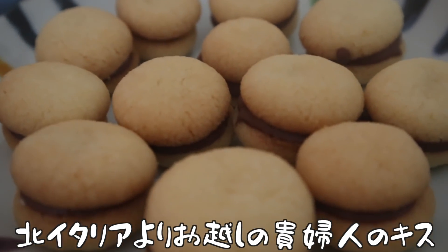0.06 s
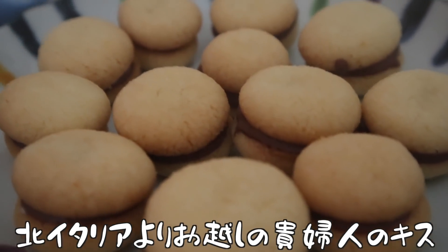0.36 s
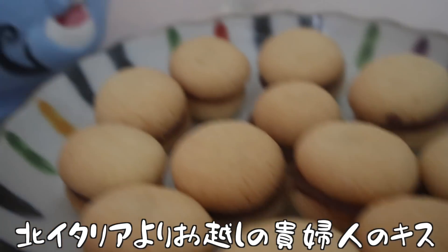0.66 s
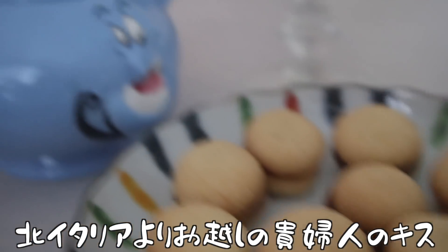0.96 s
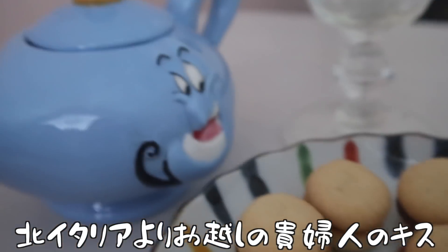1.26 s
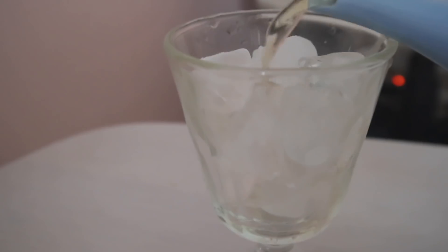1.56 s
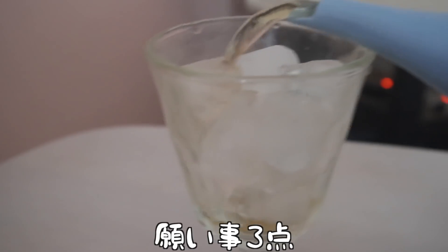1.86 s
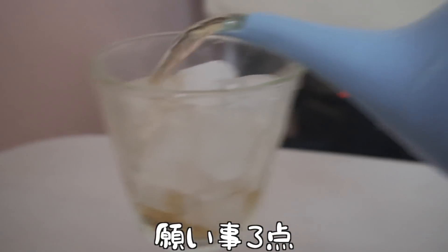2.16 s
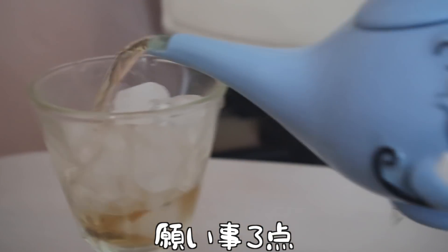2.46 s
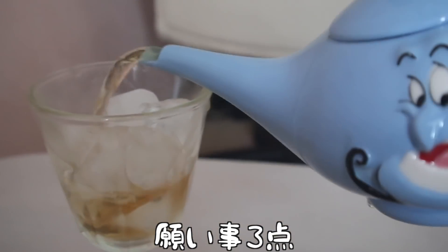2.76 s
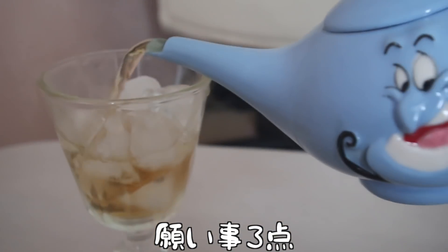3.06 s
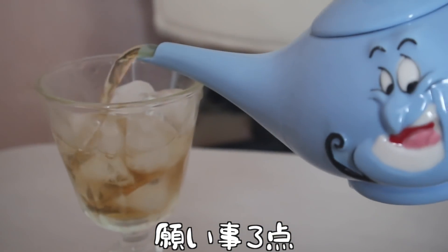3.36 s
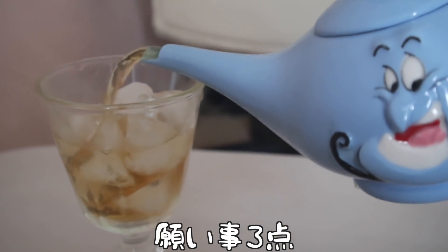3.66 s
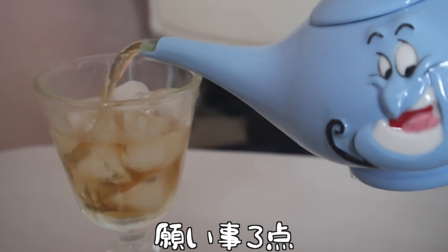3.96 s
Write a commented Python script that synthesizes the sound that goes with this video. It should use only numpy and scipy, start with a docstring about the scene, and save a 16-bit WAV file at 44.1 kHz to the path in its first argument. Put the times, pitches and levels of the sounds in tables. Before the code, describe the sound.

A thin stream of liquid trickles into a glass of crackling, knocking ice cubes.

```python
"""A quiet kitchen rumbles and hums; after a few soft ticks the background hiss steps up, and tea is
poured over ice in a glass close by. The cubes knock together and snap as they warm. Each impact excites
the modes of the cubes, the glass and the air above the tea, whose resonance rises as the glass fills.
Between the knocks a thin trickle patters and plops, and air freed from the melting ice fizzes."""
import sys
import numpy as np
from scipy import signal
from scipy.fft import rfft, irfft, next_fast_len
from scipy.io import wavfile

SR = 44100
rng = np.random.default_rng(int(sys.argv[2]) if len(sys.argv) > 2 else 0)


def log_audio(samples):
    """Write samples as a 16-bit WAV file to the path given in sys.argv[1]."""
    # one column per channel
    frames = np.atleast_2d(samples).T
    # limit to full scale, then quantise
    limited = np.clip(frames, -1, 1)
    pcm = np.round(limited * 32767).astype(np.int16)
    wavfile.write(sys.argv[1], SR, pcm)


N = 176400
TOP_HZ = 16500


def amp(db):
    """Decibels as an amplitude ratio."""
    return 10 ** (np.asarray(db) / 20)


def unit(x):
    """Normalisation to rms 1."""
    return x / np.sqrt(np.mean(x ** 2) + 1e-20)


def blow(x, duration_s=0.005):
    """Normalisation to the energy of a short pulse of rms 1."""
    return x * np.sqrt(duration_s * SR / (np.sum(x ** 2) + 1e-20))


def along(points, hz):
    """Interpolation on a logarithmic frequency axis."""
    f, values = np.transpose(points)
    return np.interp(np.log(hz + 1), np.log(f + 1), values)


def at(points, s):
    """Linear interpolation in time."""
    return np.interp(s, *np.transpose(points))


def filtered(x, response):
    """Linear filtering: the spectrum is multiplied by a frequency response."""
    n = x.shape[-1]
    size = next_fast_len(n + 4096)
    return irfft(rfft(x, size) * response(np.fft.rfftfreq(size, 1 / SR)), size)[..., :n]


def add(track, start_s, x):
    """Superposition of x on the track."""
    part = track[max(round(start_s * SR), 0):][:len(x)]
    part += x[:len(part)]


def ring(t, hz, t60):
    """A damped oscillator that builds up within its first cycle."""
    return np.sin(2 * np.pi * hz * t) * amp(-60 * t / t60) * (1 - np.exp(-2 * hz * t))


def band(x, hz, width):
    """A Gaussian band-pass; width is a fraction of the centre frequency."""
    return filtered(x, lambda f: np.exp(-((f / hz - 1) / width) ** 2 / 2))


def burst(t, hz, width, t60):
    """A transient of exponentially decaying band noise."""
    noise = np.pad(rng.standard_normal(len(t)) * amp(-60 * t / t60), (32, 0))
    return blow(band(noise, hz, width)[20:-12])


def room_tone():
    """Background noise: a broadband rumble with swelling bass, and phase-modulated appliance hum."""
    spectrum = [(15, -37), (25, -46), (49, -5), (108, -2), (145, -4.5), (185, -6), (344, -10), (416, -14.5),
                (463, -14), (659, -22), (936, -21.5), (1130, -24.5), (1330, -25.5), (9570, -49),
                (16000, -86)]  # rumble: frequency_hz, relative_density_db
    width = [(60, -45), (110, -32.5), (200, -19), (380, -12), (700, -3.5), (1290, -2.5), (2380, 2),
             (4400, 5), (8120, 3), (15000, 21)]  # stereo spread: frequency_hz, side_over_mid_db
    swell = [(0, 0.5), (1.2, 4.1), (2.9, 1.5), (3.05, 12.8), (3.25, 7.9), (3.5, 4.5), (4, 8.5)]  # bass of the rumble: time_s, gain_db
    hum_tones = [(59.5, -51.5), (247.6, -52)]  # appliance: pitch_hz, level_db
    t = np.arange(N) / SR
    noise = rng.standard_normal((2, N))
    mid, side = filtered(noise, lambda f: amp([along(spectrum, f), along(spectrum, f) + along(width, f)]))
    air = amp(-38.5) * unit(np.array([mid + side, mid - side]))
    bass = filtered(air, lambda f: 1 / (1 + (f / 80) ** 4))  # below 80 Hz
    hum = 0
    for hz, db in hum_tones:
        drift = unit(filtered(rng.standard_normal(N), lambda f: np.exp(-(f / 3) ** 2)))
        hum += amp(db) * np.sqrt(2) * np.sin(2 * np.pi * hz * t + 1.2 * drift)
    return air + (amp(at(swell, t)) - 1) * bass + hum


def taps():
    """Heavily damped transients, heard as dull ticks leading up to the pour."""
    ticks = [(.848, -48), (.899, -44), (1.002, -42.5), (1.573, -48)]  # soft ticks: start_s, level_db
    out, t = np.zeros(N), np.arange(SR // 25) / SR
    for s, db in ticks:
        add(out, s, amp(db) * burst(t, hz=1200, width=0.28, t60=0.03))
    return out


def diffuse_tail():
    """A diffuse field's impulse response: noise decaying band by band, alike in both ears when low."""
    decay = [(400, 0.23), (1100, 0.2), (2800, 0.17), (7000, 0.18), (11000, 0.17), (14000, 0.058)]  # reverberation time: frequency_hz, t60_s
    colour = [(300, 3.5), (1100, -4.5), (2000, -3), (3000, -4), (4700, 1), (7000, 0.5), (11000, -1),
              (14000, 7)]  # reverberant spectrum: frequency_hz, gain_db
    likeness = [(400, 0.98), (1500, 0.92), (3000, 0.46), (6000, -0.21)]  # left against right: frequency_hz, correlation

    def mid_side_gains(f):
        angle = np.arccos(np.clip(along(likeness, f), -1, 1)) / 2
        return np.array([np.cos(angle), np.sin(angle)])

    hz, t, bands = signal.stft(rng.standard_normal((2, SR // 3)), SR, nperseg=256)
    fade = amp(-60 * t / along(decay, hz)[:, None]) * (1 - np.exp(-t / 0.0005))
    tail = signal.istft(bands * fade, SR, nperseg=256)[1]
    mid, side = filtered(tail / np.linalg.norm(tail[0]), mid_side_gains)
    return filtered(np.array([mid + side, mid - side]), lambda f: amp(along(colour, f)))


def kitchen(x, size=8820):
    """Early reflections interfere with the direct sound; an ever-changing reverberation follows."""
    walls = [(.0029, 0.091), (.0081, 0.043), (0.0097, .12)]  # echoes from nearby surfaces: delay_s, gain
    reverb, padded = np.zeros((2, N)), np.pad(x, (0, size))
    for start in range(0, N, size // 2):
        piece = padded[start:start + size] * np.sqrt(np.hanning(size))
        for track, response in zip(reverb, signal.fftconvolve(piece[None], diffuse_tail(), axes=1)):
            add(track, start / SR, response)
    near = filtered(x, lambda f: 1 + sum(gain * np.exp(-2j * np.pi * f * s) for s, gain in walls))
    return near + amp(-3) * reverb


def background_hiss(start_s=1.544, rise_s=0.061):
    """Spectrally shaped noise: a steady hiss and low hum that step up just before the pour."""
    spectrum = [(150, -21), (260, 6.5), (400, -16), (500, 1.5), (620, 1), (1100, -8), (2000, -23),
                (3000, -23.5), (5000, -23), (8000, -25.5), (11000, -29), (16000, -64)]  # background hiss and low hum: frequency_hz, relative_density_db
    hiss = unit(filtered(rng.standard_normal(N), lambda f: amp(along(spectrum, f))))
    onset = np.clip((np.arange(N) / SR - start_s) / rise_s, 0, 1)
    return amp(-51.5) * onset * hiss


def bubbles(per_s, hz, spread, cycles, scatter_db):
    """Bubble resonance: randomly timed, rising rings with log-normal pitches, at rms 1 overall."""
    out, t = np.zeros(N), np.arange(SR // 50) / SR
    when, radius, angle, strength = rng.random((int(per_s * N / SR), 4)).T
    pitches = hz * np.exp(spread * np.sqrt(-2 * np.log(1 - radius)) * np.cos(2 * np.pi * angle))
    gains = amp(scatter_db * np.minimum(-np.log(1 - strength), 4))
    for s, pitch, gain in zip(when * N / SR, np.minimum(pitches, TOP_HZ), gains):
        t60 = cycles / pitch
        glide = 1 + 0.26 * np.minimum(t / t60, 1)
        add(out, s, gain * ring(t, pitch * glide, t60))
    return unit(out)


def trickle():
    """Three bubble populations: the smaller the bubble, the higher its resonance."""
    patter_db = [(1.52, -78), (1.63, -48), (1.72, -60), (1.82, -57), (1.97, -52.5), (2.08, -62),
                 (2.25, -63), (2.43, -47), (2.52, -56), (2.8, -57.5), (3.13, -52.5), (3.3, -58.5),
                 (3.7, -61.5), (4, -63)]  # stream on the cubes: time_s, level_db
    fizz_db = [(1.5, -95), (1.64, -72), (2.3, -86), (2.75, -63), (3.2, -73), (3.6, -54), (4, -104)]  # air freed from melting ice: time_s, level_db
    spatter_db = [(1.57, -73), (1.63, -47), (1.74, -58), (1.79, -64), (2.25, -69), (2.35, -52.5),
                  (2.5, -63), (3.2, -62.5), (4, -59)]  # tea falling to the bottom of the glass: time_s, level_db
    t = np.arange(N) / SR
    patter = amp(at(patter_db, t)) * bubbles(per_s=600, hz=2494, spread=0.29, cycles=14, scatter_db=4)
    fizz = amp(at(fizz_db, t)) * bubbles(per_s=900, hz=5560, spread=0.23, cycles=17, scatter_db=6)
    spatter = amp(at(spatter_db, t)) * bubbles(per_s=340, hz=513, spread=0.192, cycles=14, scatter_db=1.5)
    return patter + spatter + fizz


def struck(t, modes, spread=0, pitch_ratio=1, scatter_db=2.2):
    """Modal superposition: every blow excites the modes with different strengths and signs."""
    out = np.zeros(len(t))
    for hz, db, t60 in modes:
        gain = amp(db + scatter_db * rng.normal()) * rng.choice([-1, 1])
        out += gain * ring(t, pitch_ratio * hz * np.exp(spread * rng.normal()), t60)
    return out


def ice():
    """Impacts and thermal cracks excite the cubes, the glass and its air cavity; returns mid and side."""
    # knocks and cracks, levels relative: start_s, thud_db, hollow_db, clack_db, clack_hz, snap_db, snap_hz
    knocks = [(1.6044, -48, -50, -38, 2720, -55, 6600), (1.625, -32.5, -55, -48, 2600, -38.5, 5800),
              (1.629, -41, -34.5, -37.5, 2500, -61, 6900), (1.6338, -35, -40, -61, 2700, -66, 6800),
              (1.6617, -46, -42, -44, 3040, -70, 5900), (1.6684, -47, -52, -59, 2920, -44.5, 8200),
              (1.678, -32, -39, -33.5, 3010, -40, 4800), (1.7007, -35.5, -36.5, -39, 3040, -55, 5400),
              (1.7273, -28.5, -32, -29.5, 2870, -53, 5600), (1.7994, -64, -47, -43.5, 3620, -44.5, 7840),
              (1.8647, -61, -61, -67, 2800, -39, 9600), (1.913, -38.5, -40.5, -32.5, 2500, -46, 5170),
              (1.938, -39, -40, -52, 2730, -51, 8400), (1.9442, -46, -52, -50, 2920, -47, 9800),
              (1.97, -40, -34, -37.5, 3020, -62, 6000), (1.9767, -34, -36, -32.5, 3240, -54, 6100),
              (2.027, -30, -30, -31.5, 3420, -28.5, 5200), (2.028, -58, -55, -40, 2500, -38.5, 9800),
              (2.1045, -57, -39, -53, 2870, -62, 5900), (2.1201, -40, -38.5, -37.5, 2820, -35.5, 7300),
              (2.1407, -59, -26.5, -25.5, 3260, -26, 8000), (2.1919, -34, -34.5, -32.5, 2560, -65, 6100),
              (2.2051, -39, -43, -34.5, 2800, -65, 6100), (2.2788, -64, -61, -41.5, 2660, -44.5, 6850),
              (2.2936, -43, -35.5, -35, 3020, -41.5, 7950), (2.3024, -37.5, -53, -62, 2950, -37.5, 7260),
              (2.3267, -43, -48, -35.5, 3560, -47, 6000), (2.3429, -40, -37, -32.5, 2755, -59, 5600),
              (2.3493, -31.5, -28, -26, 2890, -48, 5100), (2.365, -60, -42, -31.5, 2620, -60, 5500),
              (2.39, -58, -43, -56, 2710, -59, 6000), (2.4231, -39, -37.5, -35, 3160, -63, 5560),
              (2.43, -43, -42, -39, 3000, -66, 5800), (2.4468, -35, -40, -38, 2940, -74, 5100),
              (2.4675, -63, -47, -33.5, 3320, -36.5, 6540), (2.5252, -60, -60, -35, 3300, -44, 6340),
              (2.5324, -51, -33, -33, 3520, -28.5, 6500), (2.5393, -47, -28.5, -26.5, 2840, -25, 7360),
              (2.547, -53, -44, -33, 3280, -41, 7540), (2.551, -36, -39, -29, 3010, -32.5, 9000),
              (2.562, -29, -23, -24.5, 2970, -38, 6200), (2.6461, -39, -42.5, -60, 2780, -70, 6500),
              (2.688, -68, -35, -39, 2040, -67, 5350), (2.7396, -34.5, -31, -34, 2500, -40.5, 4940),
              (2.8049, -35, -40.5, -45.5, 2680, -57, 6000), (2.841, -56, -56, -52, 2880, -46, 7100),
              (2.876, -31.5, -29, -23, 3074, -33.5, 4600), (2.966, -35, -49, -42, 2820, -62, 5700),
              (3.006, -65, -46, -46, 3030, -45.5, 8600), (3.046, -40, -50, -45, 2860, -64, 5900),
              (3.0961, -57, -40.5, -50, 2670, -71, 6200), (3.124, -49, -57, -41, 2820, -58, 5500),
              (3.14, -39, -49, -41.5, 2900, -68, 6000), (3.1833, -44, -54, -51, 3980, -41, 7640),
              (3.3989, -37.5, -34, -21, 2880, -23, 6500), (3.4024, -44, -49, -37, 2910, -37, 5600),
              (3.4362, -51, -50, -39, 2720, -62, 6600), (3.452, -40, -55, -35, 3100, -31, 8160),
              (3.5649, -65, -38.5, -34.5, 2840, -30.5, 8200), (3.621, -60, -65, -44, 4160, -52, 5600),
              (3.7726, -44, -62, -69, 2850, -51.5, 6300), (3.948, -50, -62, -66, 2900, -47, 5840)]
    cavity = [(1.62, 1160), (1.73, 1170), (1.92, 1320), (2.03, 1300), (2.14, 1460), (2.35, 1490),
              (2.53, 1520), (2.57, 1654), (2.88, 1750), (3.4, 1760), (4, 1980)]  # air resonance above the rising tea: time_s, pitch_hz
    # modes: pitch_hz, relative_db, t60_s
    cube_modes = [(1840, -15, 0.0068), (2395, -6.5, 0.026), (2756, -0.5, 0.021), (3182, -1, 0.016),
                  (3460, 2, 0.0081)]  # a middling cube, pitched at 2900 Hz, against the wall
    thud_modes = [(365, -8, .06), (450, -4.5, .05), (512, .5, .075), (720, -13, .04), (938, -10, .06),
                  (1120, -10, .06)]  # low body of the jolted glass
    glass_modes = [(1075, -28, .17), (1307, -29, .17), (1441, -28, .2), (1534, -27, .2), (1752, -27, .2),
                   (2478, -27, .2), (2622, -28, .2), (3007, -24, .22), (3395, -27, .2)]  # its longer ring
    mid, side = np.zeros(N), np.zeros(N)
    t, t_long = np.arange(SR // 25) / SR, np.arange(SR // 2) / SR
    for s, thud_db, hollow_db, clack_db, clack_hz, snap_db, snap_hz in knocks:
        air_hz = at(cavity, s)
        air_tone = blow(ring(t, air_hz, t60=0.015))
        hollow = blow(air_tone + 0.81 * burst(t, air_hz, width=0.14, t60=0.015))
        cube = blow(struck(t, cube_modes, spread=0.036, pitch_ratio=clack_hz / 2900))
        clack = blow(cube + 0.75 * burst(t, clack_hz, width=0.39, t60=0.016))
        snap, snap_side = (amp(snap_db) * burst(t, snap_hz, width=0.43, t60=0.018) for _ in range(2))
        thud = amp(thud_db - 1.5) * struck(t_long, thud_modes, spread=0.025)
        glass = amp(hollow_db) * struck(t_long, glass_modes)
        puff = amp(thud_db - 7.5) * (1 - np.exp(-t / 0.00066)) * burst(t, hz=487, width=1.0, t60=0.057)
        fracture = amp(snap_db - 14) * burst(t, 0.98 * snap_hz, width=0.65, t60=0.0089)
        add(mid, s, amp(hollow_db + 0.5) * hollow + amp(clack_db - 0.5) * clack + snap + puff + fracture)
        add(mid, s, thud + glass)
        add(side, s, 0.54 * snap_side)
    return mid, side


def plops():
    """A larger bubble pulsates, its resonance rising slightly as it nears the surface."""
    trapped = [(1.632, 1100, -28.5), (1.663, 1114, -36), (1.68, 1140, -37), (1.703, 1097, -42),
               (1.972, 1850, -34.5), (2.029, 1270, -31), (2.346, 2450, -23), (2.351, 990, -30.5),
               (2.367, 2540, -27), (2.69, 1820, -36), (2.967, 1040, -41.5), (3.399, 1150, -32),
               (3.436, 1210, -31.5)]  # bubbles between the cubes: start_s, pitch_hz, level_db
    out, t = np.zeros(N), np.arange(SR // 10) / SR
    for s, hz, db in trapped:
        add(out, s, amp(db) * ring(t, hz * (1 + 0.65 * t), t60=0.061))
    return out


def chimes():
    """Free vibration of a cracked cube: closely spaced modes merge into a narrow, dying band."""
    rings = [(2.1404, 10000, -41, 0.07), (2.563, 3040, -32.5, 0.14), (3.3985, 6200, -31.5, 0.045),
             (3.3985, 8400, -29.5, 0.038), (3.4516, 6200, -40.5, 0.081), (3.4516, 11000, -38, 0.025)]  # ringing cubes: start_s, pitch_hz, relative_db, t60_s
    out, t = np.zeros(N), np.arange(SR // 3) / SR
    for s, hz, db, t60 in rings:
        cluster = unit(band(rng.standard_normal(len(t)), hz, width=0.045))
        envelope = amp(db + 3.5 - 60 * t / t60) * (1 - np.exp(-hz * t))
        add(out, s, envelope * cluster)
    return out


def scene():
    """The sources superpose in the room, over its background noise."""
    knocks, side = ice()
    sources = knocks + chimes() + trickle() + background_hiss() + plops() + taps()
    stereo = kitchen(sources) + np.array([side, -side])
    balance = amp([[-0.12], [0.12]])  # left, right
    return stereo * balance + room_tone()


def record(dry):
    """The microphone's frequency response softens the top treble and ends at its band limit."""
    response = [(20, 1.5), (10000, -2), (12000, 2.5), (13500, -4), (16000, -8)]  # microphone: frequency_hz, gain_db
    return filtered(dry, lambda f: amp(along(response, f)) * (f < TOP_HZ))


dry = scene()
out = record(dry)
log_audio(out)
```